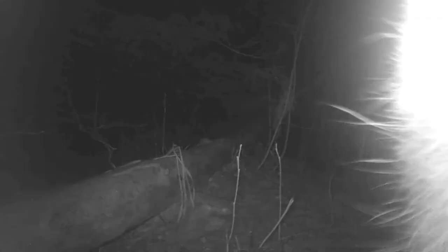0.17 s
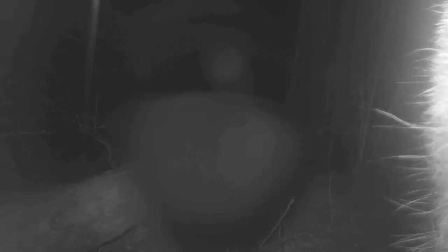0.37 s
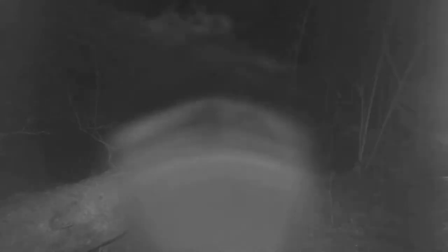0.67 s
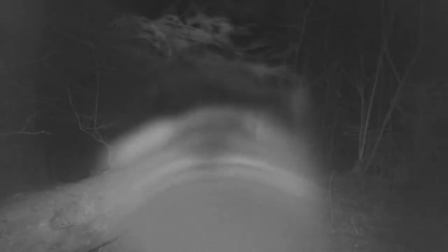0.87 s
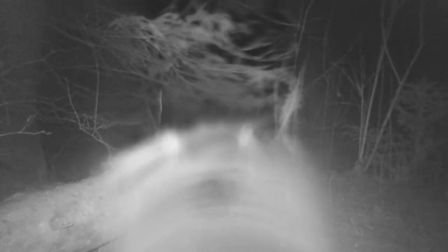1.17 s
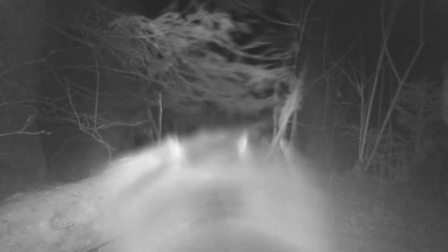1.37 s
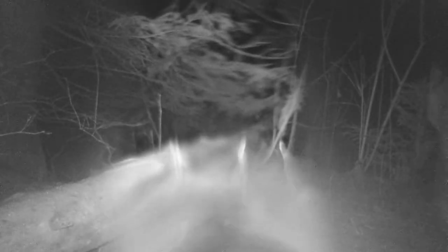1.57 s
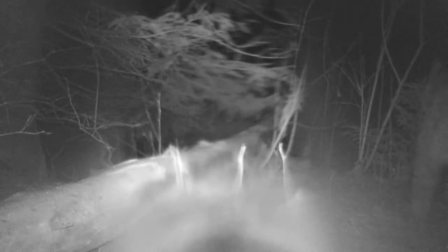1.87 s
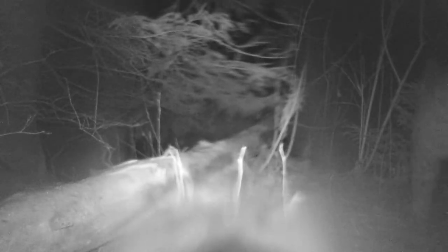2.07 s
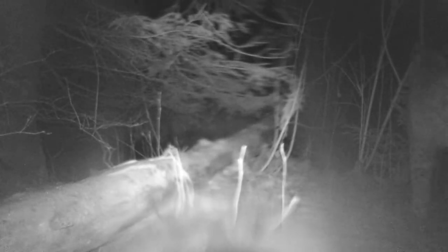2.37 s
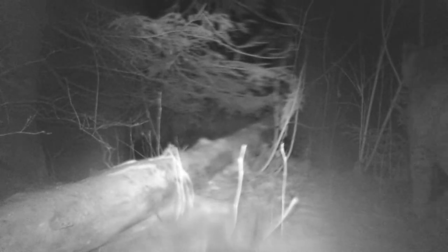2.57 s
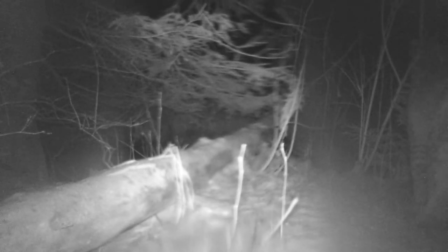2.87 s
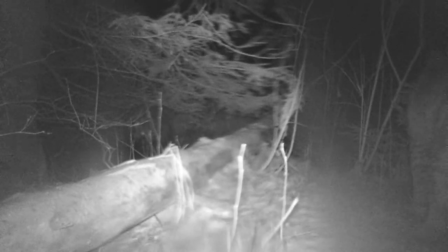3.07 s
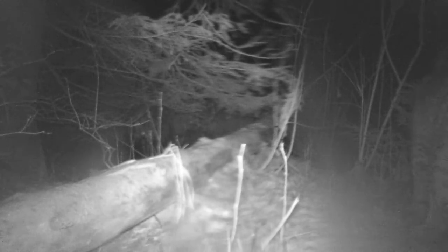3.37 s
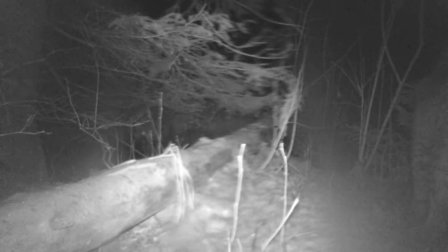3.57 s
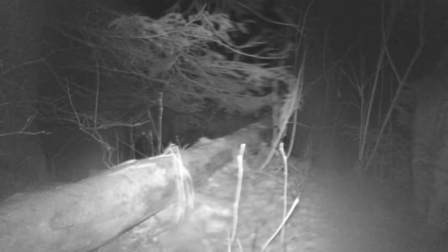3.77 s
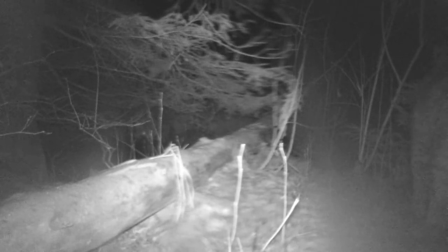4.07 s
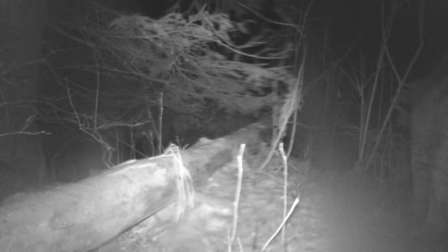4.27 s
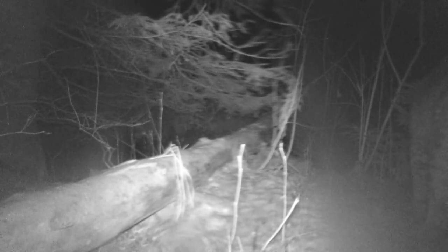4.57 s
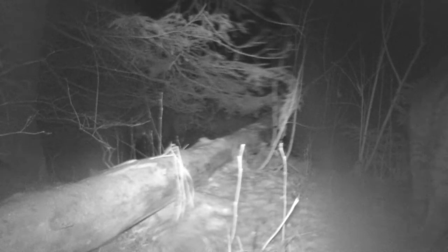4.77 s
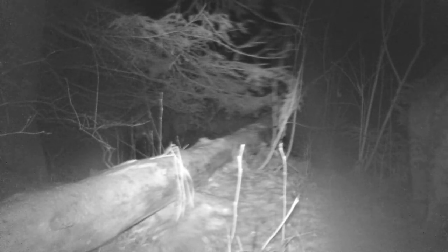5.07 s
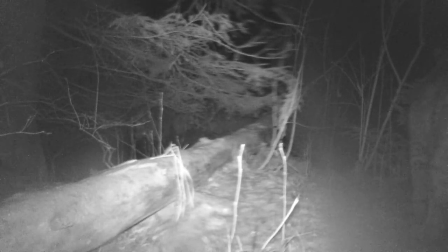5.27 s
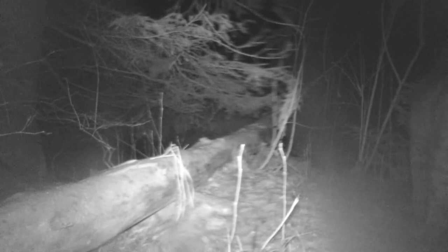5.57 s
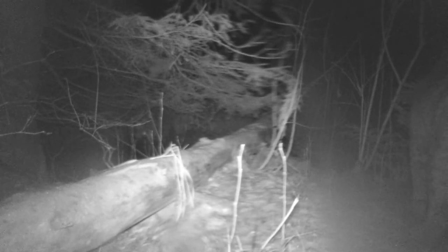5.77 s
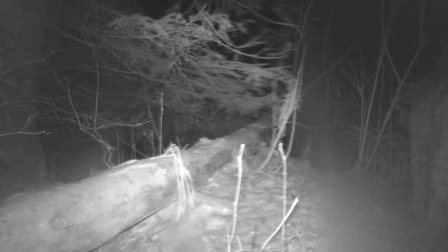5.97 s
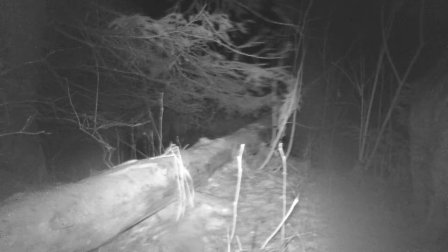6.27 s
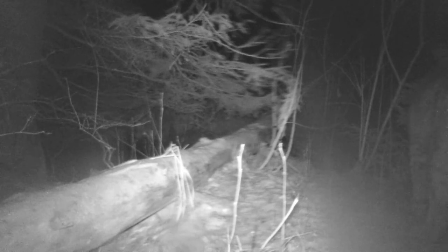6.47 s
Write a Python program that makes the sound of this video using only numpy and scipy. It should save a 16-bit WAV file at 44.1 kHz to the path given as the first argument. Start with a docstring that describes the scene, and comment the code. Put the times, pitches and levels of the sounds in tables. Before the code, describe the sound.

Fur brushes and ticks faintly against a small plastic case over steady hiss, then a wild cat growls once and yowls loudly three times.

```python
"""A quiet forest at night: a lynx brushes its fur along a trail camera, then growls once and yowls three times.
Fur is filtered chance slips, with short ticks where stiff hairs snap free, over a steady hiss.
Each call couples two oscillators, driven by pitch and effort: the folds arch in pitch, a higher voice leaps in
and rings out, both break into a rasp, and the call settles into a clear falling tone.
The trees return a faint long echo; the camera is narrow in band and overloads on the loudest peaks."""
import sys
import numpy as np
from scipy import signal
from scipy.fft import rfft, irfft, next_fast_len
from scipy.io import wavfile
from scipy.ndimage import uniform_filter1d

SR = 44100
rng = np.random.default_rng(int(sys.argv[2]) if len(sys.argv) > 2 else 0)


def unload_audio(sound):
    """Save the sound as a 16-bit wav file, at the path given as the first command line argument."""
    columns = np.transpose(np.atleast_2d(sound))
    # keep every value between -1 and 1, then stretch to whole-number steps
    steps = np.round(np.clip(columns, -1, 1) * 32767)
    wavfile.write(sys.argv[1], SR, steps.astype(np.int16))


N = 292362
TIME = np.arange(N) / SR

# Spectrum of the steady hiss. Each row: frequency in Hz, relative level in dB.
HISS_SPECTRUM = [(18, -29.5), (30, -0.5), (71, -3.5), (135, -5), (178, -5), (312, -5), (333, -7.5),
                 (457, -6.5), (559, -8.5), (598, -7.5), (877, -8.5), (1070, -11), (1350, -12.5),
                 (4960, -20.5), (6500, -42.5), (8450, -84), (14300, -120)]
HISS_DB = -57.5
# Decay of the distant echo. Each row: frequency in Hz, time to fall by 60 dB in seconds.
FOREST_DECAY = [(200, 1.3), (550, 1.1), (1050, 1.93), (1900, 1.5), (3000, .7), (6000, 0.37)]
# Colour of the distant echo. Each row: frequency in Hz, gain in dB.
FOREST_COLOUR = [(200, -14), (450, -3.5), (750, -7), (1100, -5), (1400, -3.5), (1900, 5.5), (3000, 4.5),
                 (6000, -8.5)]
# Spectrum of sliding hair. Each row: frequency in Hz, relative level in dB.
HAIR_SPECTRUM = [(1180, -38), (2000, -23), (2200, -13), (2780, -15.5), (3440, -4), (4090, 0), (5030, 5),
                 (5950, -10), (6500, -45), (8450, -74), (14300, -120)]
# Spectrum of the dull scrape. Each row: frequency in Hz, relative level in dB.
SCRAPE_SPECTRUM = [(100, -29), (200, -14.5), (400, -6), (560, 2.5), (750, -5.5), (1050, 1.5), (1700, -2),
                   (2700, 0), (3800, -9), (6000, -21)]
# Strokes of fur along the case. Each row: start in seconds, length in seconds,
# relative hair hiss in dB, relative scrape in dB.
STROKES = [(-.02, 0.19, -47, -45), (.14, .04, -42, -36), (0.347, 0.12, -54.5, -61),
           (0.486, 0.22, -54.5, -58.5), (0.77, 0.013, -42, -38.5), (0.816, 0.12, -56.5, -54.5),
           (0.921, 0.049, -48, -53), (1.055, 0.41, -56, -68), (1.233, 0.063, -48, -54),
           (1.529, 0.033, -44, -44), (1.568, 0.055, -55, -60), (1.753, 0.12, -61, -62.5),
           (2.057, 0.044, -49.5, -59.5), (2.195, 0.047, -62, -64), (2.36, 0.092, -60.5, -61),
           (2.508, 0.14, -55.5, -72), (2.845, 0.23, -57.5, -60)]
# The stiffest hairs flicking off the case. Each row: start in seconds, relative strength in dB,
# relative share of the low knock in dB.
HAIR_FLICKS = [(0.1532, -21, -6), (0.4116, -34.5, -5), (0.4685, -35.5, -10), (0.554, -34.5, -15),
               (0.7625, -30, -6), (0.7853, -22.5, -14), (0.853, -31.5, -18), (0.883, -37.5, -14),
               (0.9108, -36, 0.5), (1.0865, -35, -15), (1.2201, -36, -13), (1.4697, -33.5, -22),
               (1.5179, -35, -19), (1.574, -34, -12), (1.6399, -36.5, -7), (1.748, -35.5, -16),
               (1.7752, -33, -12), (1.841, -38, -6), (2.353, -35.5, -25), (2.385, -38.5, -18),
               (2.69, -29.5, -22), (2.841, -39.5, -6)]
# Narrow resonances of the camera case. Each row: frequency in Hz, nominal width in Hz, lift in dB.
CASE_RESONANCES = [(1271, 42, 6), (1590, 33, 6.5), (1712, 11, 10), (1918, 83, 6), (1973, 27, 4),
                   (2115, 28, 9.5), (2303, 30, 10), (2676, 46, 6.5)]
# Controls of the growl. Each row: time in seconds, fold pitch in Hz, effort in dB.
GROWL_CURVE = [(2.464, 156.8, -53), (2.478, 180, -34.5), (2.515, 290.4, -26), (2.58, 345.4, -19),
               (2.635, 345.7, -22), (2.66, 294.3, -24.5), (2.72, 290.4, -28), (2.755, 335.6, -29.5),
               (2.805, 242.8, -39), (2.855, 285.5, -57.5)]
# Controls of the first yowl. Each row: time in seconds, fold pitch in Hz, effort in dB.
YOWL_1_CURVE = [(3.803, 215.5, -54), (3.822, 245, -37), (3.848, 384.8, -22), (3.875, 480, -19.5),
                (3.887, 504, -11.5), (3.908, 518.4, -8.2), (3.975, 537, -14), (4.03, 476.3, -20),
                (4.09, 473.4, -24), (4.14, 369, -35.5), (4.175, 362, -52.5)]
# Controls of the second yowl. Each row: time in seconds, fold pitch in Hz, effort in dB.
YOWL_2_CURVE = [(5.038, 330, -53), (5.085, 464.3, -19.5), (5.115, 558.1, -12), (5.15, 639.8, -9.2),
                (5.185, 688.7, -9.3), (5.27, 584.7, -14.5), (5.36, 491.8, -21.5), (5.4, 405.4, -31),
                (5.435, 387.3, -44)]
# Controls of the third yowl. Each row: time in seconds, fold pitch in Hz, effort in dB.
YOWL_3_CURVE = [(6.267, 330, -52), (6.303, 485, -21), (6.335, 632.7, -13.5), (6.378, 731, -7.8),
                (6.445, 711.2, -6.2), (6.505, 636, -13.5), (6.56, 558.2, -15.5), (6.629, 516.7, -21)]
# Changes of register, one row a call. Each row: leap of the upper voice in seconds, its ceiling in Hz,
# sag of the ceiling in Hz per second, time of its ring in seconds, width of the ring in seconds,
# lift of the ring in dB, onset of the rasp in seconds, settling in seconds, lift on settling in dB.
REGISTERS = [(2.625, 906.5, 1197, 2.6, 0.042, 21, 2.645, 2.655, 7),
             (3.888, 1041, 449.4, 3.908, .12, 12, 3.945, 4.025, 14),
             (5.106, 1127, 502, 5.14, 0.14, 16, 5.222, 5.298, 14),
             (6.327, 1185, 1000, 6.35, .14, 13, 6.503, 6.56, 12)]
# Balance, one row a call. Each row: folds against the rasp in dB, their gain at the opening in dB,
# their gain at the top of the arch in dB, upper voice against the rasp in dB,
# treble against effort in dB, greatest treble in dB.
BALANCES = [(-11.5, 12, -8, -14, -14.5, -37.8), (-12.5, 13, 1, -4, -12.5, -31.5),
            (-12.5, 9, 13, -4.5, -15.5, -28.8), (-10, 2, 14.5, -1.5, -15.5, -27)]
# Throat with the mouth wide open. Each row: frequency at the resting mouth in Hz, gain in dB.
OPEN_THROAT = [(250, -11), (520, -11), (740, 0), (980, 1), (1200, -16), (1470, -21.5), (1780, -14),
               (2080, -23), (2330, -24), (2750, -42.5), (3600, -54), (4400, -46), (5000, -42), (5900, -39)]
# Throat with the mouth half shut. Each row: frequency at the resting mouth in Hz, gain in dB.
HALF_SHUT_THROAT = [(110, -51), (135, -18), (175, 1.5), (250, -5.5), (350, -5), (500, 8.5), (700, -5),
                    (900, 3), (1150, -4.5), (1400, -18), (1820, -7), (2220, -18.5), (2650, -36),
                    (3900, -48.5), (4800, -38.5)]
# Throat resonances that ring on after each pulse. Each row: frequency in Hz, width in Hz.
THROAT_RINGS = [(520, 143), (880, 160), (1150, 228), (1800, 260), (2250, 460)]
# Sum tones of the two voices. Each row: multiple of the folds, multiple of the upper voice.
SUM_TONES = [(3, 0), (1, 1), (2, 1), (0, 2), (1, 2)]
# Strength of each sum tone ahead of the throat and the balance of the voices, in dB.
SUM_TONE_DB = [0, 0, 3, -18, 1]

STROKE_ATTACK_S, STROKE_RELEASE_S = 0.0086, 0.019
# the coat brushes lightly between strokes until the cat has passed; level relative like the strokes
CONTACT_DB, CONTACT_END_S, CONTACT_FADE_S = -63, 3.2, .15
OPENING_S, BREAK_S, SETTLE_S, LEAP_S = .035, .015, .012, .004  # time scale of each change of register
CREST_LEAD_S = .022  # the folds start to ring just before their highest pitch
BREAK_DB = -7  # the upper voice drowns when the rasp breaks in
UPPER_SETTLES = .6  # share by which the upper voice clears with the folds
TREBLE_FADES = 0.33  # share by which the treble dims as the rasp settles
HARSH_FOLLOWS = 0.32  # pulses grow steadier and less breathy as the rasp weakens, dB per dB
UPPER_SHARE = .65  # how much the sum tones follow the upper voice rather than the folds
# after the top of the arch the high resonance narrows: delay, time scale, final width, relative level
WHISTLE_LAG_S, WHISTLE_S, WHISTLE_HZ, WHISTLE_DB = .1, .03, 170, -1
CAMERA_HZ, EDGE_HZ = 5750, 15800  # low-pass corners before and after the camera's clipping
FULL_SCALE, OFFSET = .708, .0071  # clipping level and constant offset, as amplitudes


def amp(db):
    """Decibels to amplitude: 20 dB is a factor of ten."""
    return 10 ** (np.asarray(db) / 20)


def evened(x):
    """Normalisation to unit root-mean-square level."""
    return x / np.sqrt(np.mean(x ** 2) + 1e-20)


def steadied(x, size=1300):
    """Gain control: unit level over a few hundredths of a second, while faster flutter stays."""
    power = uniform_filter1d(uniform_filter1d(x ** 2, size), size // 2)
    return x / np.sqrt(abs(power) + 1e-14)


def read(points, hz):
    """Interpolation of a curve along logarithmic frequency."""
    f, value = np.transpose(points)
    return np.interp(np.log(hz + 1), np.log(f + 1), value)


def add(mix, s, sound):
    """Superposition: a sound is summed into the mix from s seconds."""
    part = mix[max(round(s * SR), 0):][:len(sound)]
    part += sound[:len(part)]


def coloured(x, spectrum):
    """Linear filtering by a spectrum of Hz and dB."""
    size = next_fast_len(len(x) + 1024)
    gain = amp(read(spectrum, np.fft.rfftfreq(size, 1 / SR)))
    return irfft(rfft(x, size) * gain, size)[:len(x)]


def wander(count, hz):
    """Band-limited chance: a fluctuation of unit size, moving up to about hz times a second."""
    f = np.fft.rfftfreq(count, 1 / SR)
    return evened(irfft(rfft(rng.standard_normal(count)) / (1 + (f / hz) ** 4), count))


def low_pass(x, hz, size):
    """Linear-phase low-pass filtering by a windowed impulse response."""
    return signal.oaconvolve(x, signal.firwin(size, hz, window=("kaiser", 8), fs=SR), "same")


def bump(x, centre, width):
    """A rounded resonance peak of height 1."""
    return 1 / (1 + (2 * (x - centre) / width) ** 2) ** 2


def step(t, at_s, width_s):
    """Smooth transition: a hyperbolic tangent from 0 to 1."""
    return .5 + .5 * np.tanh((t - at_s) / width_s)


def camera_hiss():
    """Stationary noise: random samples shaped by a fixed spectrum."""
    return amp(HISS_DB) * evened(coloured(rng.standard_normal(N), HISS_SPECTRUM))


def forest(x, near_db=-23, near_t60=0.1, far_db=-31):
    """Diffuse scattering: trunks and ground give a short tail, the wood beyond one of up to two seconds."""
    size = 2 * SR
    t = np.arange(size) / SR
    taps = rng.standard_normal(size) * (rng.random(size) < 2000 / SR) * (t > .012)
    # the far echo decays at its own rate in each band
    hz, frame_s, z = signal.stft(taps, SR, nperseg=256)
    decay = amp(-60 * frame_s / read(FOREST_DECAY, hz)[:, None])
    far = signal.istft(z * decay, nperseg=256)[1][:size]
    far = coloured(far, FOREST_COLOUR) / np.linalg.norm(far)
    near = rng.permutation(taps) * amp(-60 * t / near_t60)
    near = near / np.linalg.norm(near)
    return signal.fftconvolve(x, amp(far_db) * far + amp(near_db) * near)[:N]


def rubbing():
    """Sliding contact: each stroke catches, holds and lets go; powers add for the hiss and the scrape."""
    hair_power = amp(CONTACT_DB) ** 2 * (1 - step(TIME, CONTACT_END_S, CONTACT_FADE_S))
    scrape_power = np.zeros(N)
    for s, length, hair_db, scrape_db in STROKES:
        stroke = step(TIME, s, STROKE_ATTACK_S) * (1 - step(TIME, s + length, STROKE_RELEASE_S))
        hair_power += stroke * amp(hair_db) ** 2
        scrape_power += stroke * amp(scrape_db) ** 2
    return np.sqrt(hair_power), np.sqrt(scrape_power)


def fur(slips_per_s=2200, spread_db=5.5, clump_db=1.5, hair_db=-1.5, scrape_db=-3.5):
    """Stick-slip friction: countless hairs slip in clumps; pressing harder brings out a duller scrape."""
    sizes = amp(spread_db * np.minimum(rng.exponential(1, N), 4)) * rng.choice([-1, 1], N)
    slips = evened(sizes * (rng.random(N) < slips_per_s / SR))
    slips = slips + .5 * rng.standard_normal(N)
    slips *= amp(clump_db * wander(N, 60))
    sliding, pressing = rubbing()
    hair = evened(coloured(slips, HAIR_SPECTRUM)) * amp(hair_db) * sliding
    scrape = evened(coloured(slips, SCRAPE_SPECTRUM)) * amp(scrape_db) * pressing
    return hair + scrape


def flicks(decay_s=0.0028, flick_db=-6.0, knock_db=4.0):
    """Impulsive release: each stiff hair snaps free with a dry tick and a small knock of the plastic."""
    out, t = np.zeros(N), np.arange(1100) / SR
    envelope = np.exp(-t / decay_s) * (1 - np.exp(-t / 0.000205))
    for s, db, low_db in HAIR_FLICKS:
        burst = rng.standard_normal(len(t))
        tick = evened(coloured(burst, HAIR_SPECTRUM))
        knock = amp(low_db + knock_db) * evened(coloured(burst, SCRAPE_SPECTRUM))
        add(out, s, amp(db + flick_db) * (tick + knock) * envelope)
    return out


def case(x, between_db=-4.5):
    """Cavity resonance: the hollow case rings in a few narrow bands and swallows what lies between."""
    hz = abs(np.fft.fftfreq(4096, 1 / SR))
    lift_db = sum(db * bump(hz, f, 2 * width) for f, width, db in CASE_RESONANCES)
    lift_db = lift_db + between_db * bump(hz, 2000, 2200)
    # causal response: the case rings only after it is struck
    ring = np.fft.ifft(np.exp(np.conj(signal.hilbert(np.log(amp(lift_db)))))).real
    return signal.oaconvolve(x, ring[:len(ring) // 2])[:len(x)]


def ringing(x):
    """Group delay: each resonance holds its own band back by milliseconds, so a pulse becomes a short ring."""
    size = next_fast_len(len(x) + 2048)
    hz = np.fft.rfftfreq(size, 1 / SR)
    lag = sum(2 * np.arctan(2 * (hz - f) / width) for f, width in THROAT_RINGS)
    return irfft(rfft(x, size) * np.exp(-1j * lag), size)[:len(x)]


def whistle(drive, hz, width_hz):
    """Heterodyne resonance: shifts the moving hz down to zero, smooths twice, and shifts back."""
    turn = np.exp(2j * np.pi * np.cumsum(hz) / SR)
    r = np.exp(-np.pi * width_hz / SR)
    smooth = signal.lfilter([(1 - r) ** 2], [1, -2 * r, r * r], drive / turn)
    return (turn * smooth).real


def throat(drive, shape, mouth, lowest_hz, strain_db, nasal_db, split_hz=1450, under_db=-25, nasal_hz=1360,
           opening_s=0.1):
    """Source and filter: resonances slide with the mouth, little sounds below the voice; low and bright parts."""
    hz, at, z = signal.stft(drive, SR, nperseg=768, noverlap=576)
    t, hz = np.arange(len(drive)) / SR, hz[:, None]
    above = 1 / (1 + (np.interp(at, t, lowest_hz) / (hz + 1)) ** 16)
    shape_db = read(shape, hz / np.interp(at, t, mouth))
    # strain fills the valley above the third resonance
    shape_db += strain_db * bump(hz, 3500, 2000)
    # the nose rings until the mouth has opened
    shape_db += nasal_db * bump(hz, nasal_hz, 600) * np.exp(-(at / opening_s) ** 2)
    z = z * amp(shape_db) * (above + amp(under_db))
    low = 1 / (1 + (hz / split_hz) ** 16)
    return [signal.istft(z * part, nperseg=768, noverlap=576)[1][:len(t)] for part in (low, 1 - low)]


def larynx(curve, register, balance, free_ratio=1.54, lock_order=2):
    """Mode locking: the upper voice leaps to a harmonic, the folds ring, a rasp takes over and settles."""
    leap_s, ceiling_hz, sag_hz_per_s, ring_s, ring_length, ring_db, break_s, settle_s, settle_db = register
    folds_db, open_db, crest_db, voice_db, treble_db, most_db = balance
    s, pitch, effort = np.transpose(curve)
    t = np.arange(s[0], s[-1], 1 / SR)
    hz, effort_db = np.interp(t, s, pitch), np.interp(t, s, effort)
    locked_hz = np.minimum(lock_order * hz, ceiling_hz - sag_hz_per_s * (t - leap_s))
    upper_hz = free_ratio * hz + step(t, leap_s, LEAP_S) * (locked_hz - free_ratio * hz)
    opening_db = open_db * np.exp(-((t - t[0]) / OPENING_S) ** 2)
    broken = step(t, break_s, BREAK_S)
    crest = step(t, t[np.argmax(hz)] - CREST_LEAD_S, BREAK_S) * (1 - broken)
    clear_db = settle_db * step(t, settle_s, SETTLE_S)
    fold_db = folds_db + opening_db + crest_db * crest + clear_db
    upper_db = voice_db + ring_db * bump(t, ring_s, ring_length) + BREAK_DB * broken
    upper_db += UPPER_SETTLES * clear_db
    # the three share one breath: what the tones gain, the rasp loses
    rough_db = effort_db - 10 * np.log10(1 + amp(fold_db) ** 2 + amp(upper_db) ** 2)
    bright_db = np.minimum(effort_db + treble_db - clear_db * TREBLE_FADES, most_db) - rough_db
    return t, hz, rough_db + fold_db, upper_hz, rough_db + upper_db, rough_db, bright_db


def chest(voices, chest_db=-12.0, steepness=5.1):
    """Period doubling: a hum an octave below the folds, strongest at the height of the growl."""
    t, hz, _, _, _, rough_db, _ = voices
    hum = np.sin(np.pi * np.cumsum(hz * (1 + .015 * wander(len(t), 60))) / SR)
    level = amp(chest_db + rough_db) * (hz / hz.max()) ** steepness
    return t[0], hum * level * signal.windows.tukey(len(t), .4)


def call(voices, shape, rest_hz, low_edge, jitter, shimmer, doubling, air, strain_db, nasal_db, edge_hz, edge_db,
         mouth_follow=0.19, waver=.008, edge_follow=.38, mixing_db=0.):
    """Coupled oscillators: two voices and their sum tones, with uneven pulses and puffs ringing the throat."""
    t, hz, fold_db, upper_hz, upper_db, rough_db, bright_db = voices
    count, mouth = len(t), (hz / rest_hz) ** mouth_follow
    tremor = 1 + waver * wander(count, 90)
    fold, upper = (2 * np.pi * np.cumsum(f * tremor) / SR for f in (hz, upper_hz))
    tones = amp(fold_db) * np.sin(fold)
    tones += amp(upper_db) * np.sin(upper) * (1 + 0.17 * wander(count, 110))
    # the upper voice rides on the folds' airflow, which makes unsteady sum tones
    for (m, n), db in zip(SUM_TONES, SUM_TONE_DB):
        sum_hz = m * hz + n * upper_hz
        level_db = db + mixing_db + fold_db + UPPER_SHARE * (upper_db - fold_db)
        level_db += read(shape, sum_hz / mouth) + strain_db * bump(sum_hz, 3500, 2000)
        sum_tone = np.sin(m * fold + n * upper + 0.51 * wander(count, 80))
        tones += amp(level_db) * sum_tone * (1 + 0.14 * wander(count, 100))
    # rasp: closures come early or late, strong and weak in turn
    harsh = amp(HARSH_FOLLOWS * (rough_db - rough_db.max()))
    turns = fold / (2 * np.pi) + harsh * jitter * wander(count, 170)
    closed = np.diff(np.maximum.accumulate(np.floor(turns)), prepend=np.floor(turns[0]))
    force = np.exp(shimmer * wander(count, 310)) * (1 + doubling * np.cos(np.pi * turns))
    puffs = (.3 + np.exp(-(turns % 1) / .4)) * rng.standard_normal(count)
    pulses = evened(closed - closed.mean())
    drive = ringing(force * (pulses + harsh * air * evened(puffs)))
    low, bright = throat(drive, shape, mouth, low_edge * hz, strain_db, nasal_db)
    rasp = amp(rough_db) * (steadied(low, size=800) + amp(bright_db) * steadied(bright))
    # a thin high resonance grows only slowly with effort and sags as the call dies away
    top_s = t[np.argmax(hz)]
    sag = np.where(t > top_s, np.minimum(hz / rest_hz, 1), 1) ** edge_follow
    narrow = step(t, top_s + WHISTLE_LAG_S, WHISTLE_S)
    edge = (1 - .5 * narrow) * steadied(whistle(drive, edge_hz * sag, width_hz=520))
    edge += amp(WHISTLE_DB) * narrow * steadied(whistle(drive, edge_hz * sag, width_hz=WHISTLE_HZ))
    rasp += amp(edge_db + .55 * rough_db) * edge
    fade = np.clip(np.minimum(t - t[0], t[-1] - t) / .003, 0, 1)
    return t[0], (np.sqrt(2) * tones + rasp) * fade


def lynx():
    """Nonlinear phonation: a low rattling growl, then three yowls, each more strained than the last."""
    voice = np.zeros(N)
    growl = larynx(GROWL_CURVE, REGISTERS[0], BALANCES[0], free_ratio=2.5, lock_order=3)
    first = larynx(YOWL_1_CURVE, REGISTERS[1], BALANCES[1])
    second = larynx(YOWL_2_CURVE, REGISTERS[2], BALANCES[2])
    third = larynx(YOWL_3_CURVE, REGISTERS[3], BALANCES[3])
    add(voice, *call(growl, HALF_SHUT_THROAT, rest_hz=318, low_edge=.52, jitter=.08, shimmer=.22,
                     doubling=0.48, air=.48, strain_db=-4.0, nasal_db=10.0, edge_hz=4700, edge_db=-49.5,
                     mixing_db=-8.))
    add(voice, *chest(growl))
    add(voice, *call(first, OPEN_THROAT, rest_hz=523, low_edge=0.86, jitter=.11, shimmer=0.45,
                     doubling=.45, air=0.59, strain_db=-2.0, nasal_db=21.0, edge_hz=4800, edge_db=-49.5))
    add(voice, *call(second, OPEN_THROAT, rest_hz=557, low_edge=0.75, jitter=.12, shimmer=0.25,
                     doubling=0.59, air=0.61, strain_db=4.5, nasal_db=13.0, edge_hz=4980, edge_db=-44.5))
    add(voice, *call(third, OPEN_THROAT, rest_hz=530, low_edge=0.75, jitter=.11, shimmer=0.19,
                     doubling=0.57, air=0.89, strain_db=9.5, nasal_db=12., edge_hz=4870, edge_db=-44.0))
    return case(voice)


def scene():
    """Superposition of hiss, fur, flicked hairs, and the calls with their echo."""
    voice = lynx()
    return (camera_hiss() + forest(voice) + fur() + flicks() + voice)[None]


def record(dry, grain_db=-96):
    """Saturation: the microphone rounds peaks; the camera narrows the band, clips and adds a trace of hiss."""
    rounded = dry[0] / (1 + (dry[0] / .83) ** 10) ** (1 / 10)
    clipped = np.clip(low_pass(rounded, CAMERA_HZ, size=151), -FULL_SCALE, FULL_SCALE)
    grain = amp(grain_db) * rng.standard_normal(N)
    return low_pass(clipped + grain, EDGE_HZ, size=511)[None] + OFFSET


dry = scene()
out = record(dry)
unload_audio(out)
```